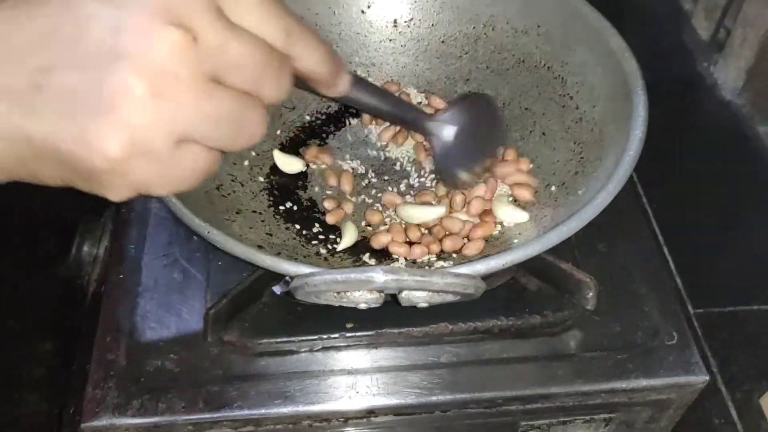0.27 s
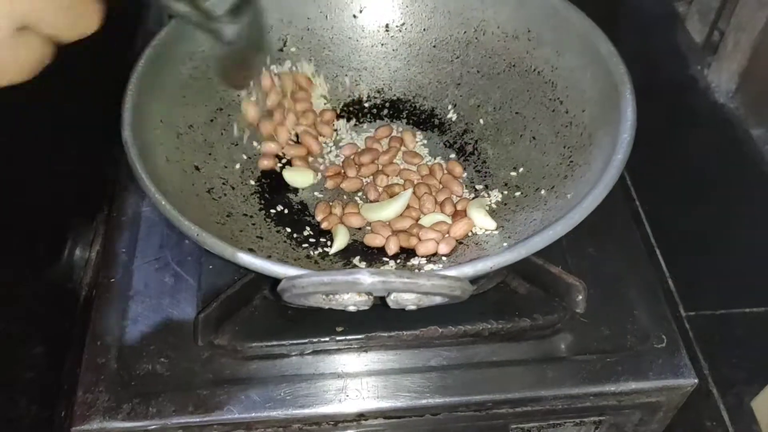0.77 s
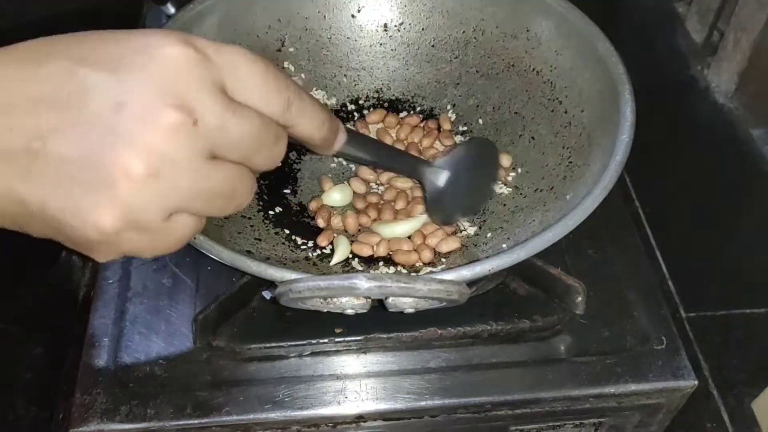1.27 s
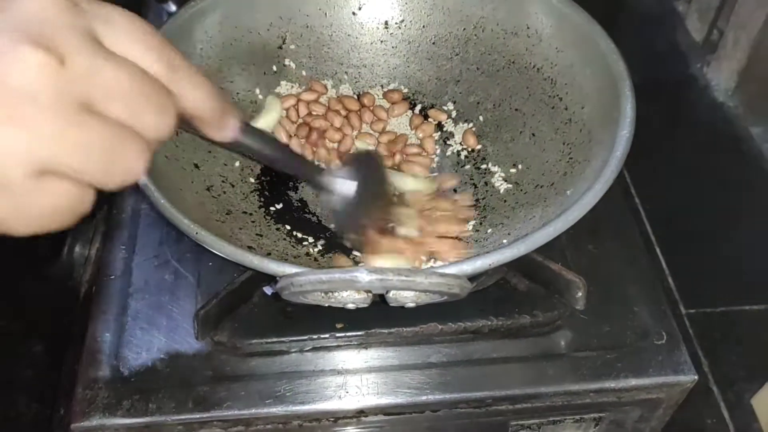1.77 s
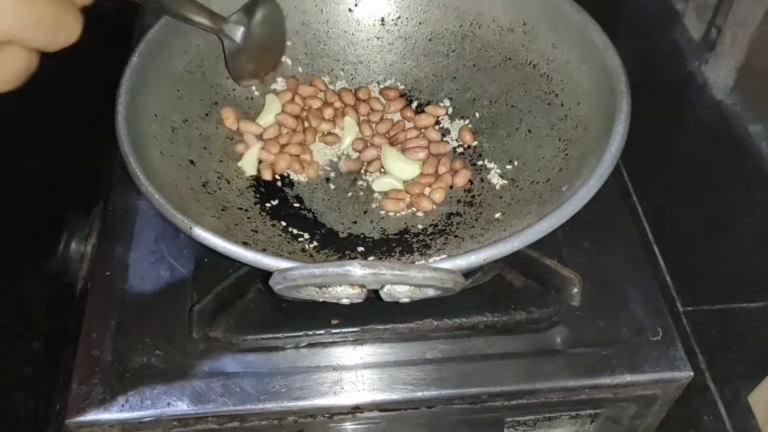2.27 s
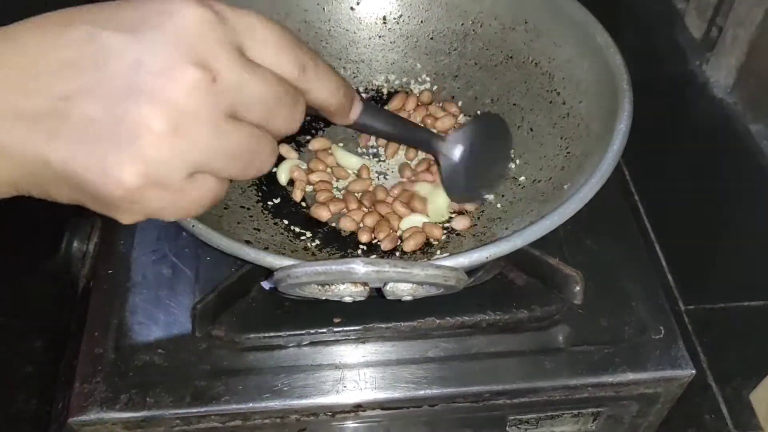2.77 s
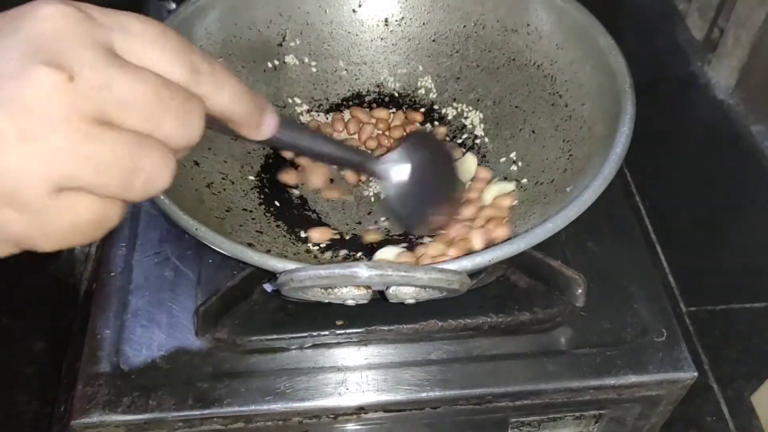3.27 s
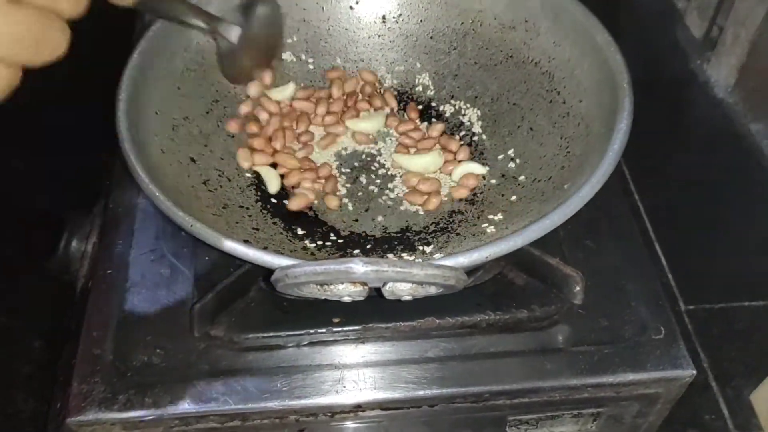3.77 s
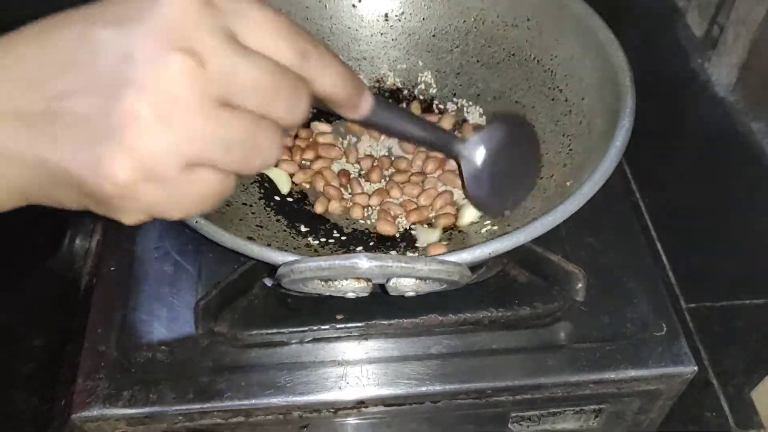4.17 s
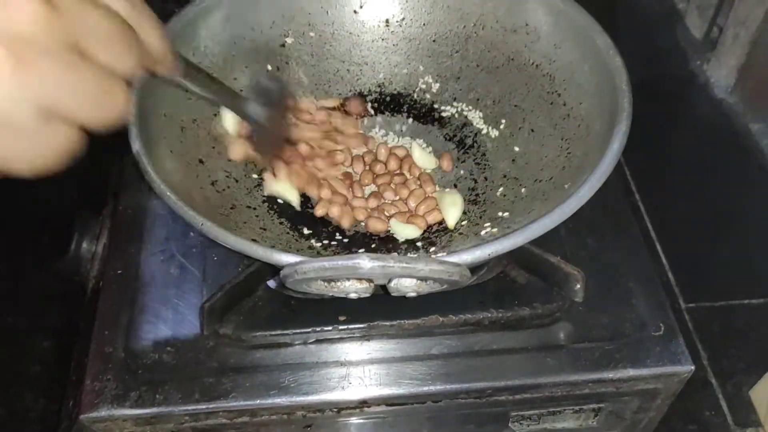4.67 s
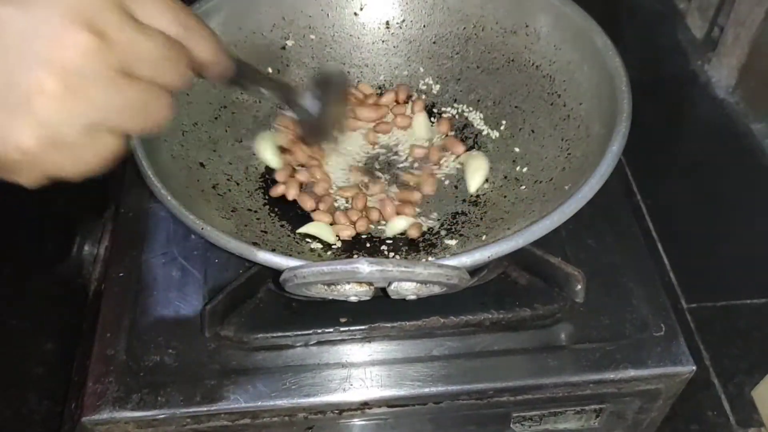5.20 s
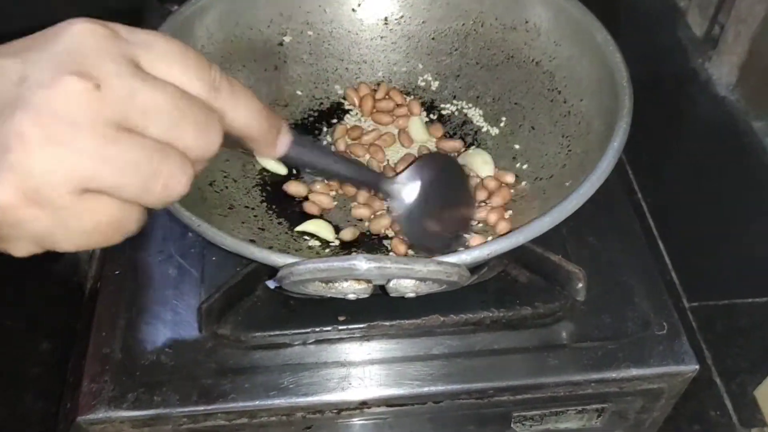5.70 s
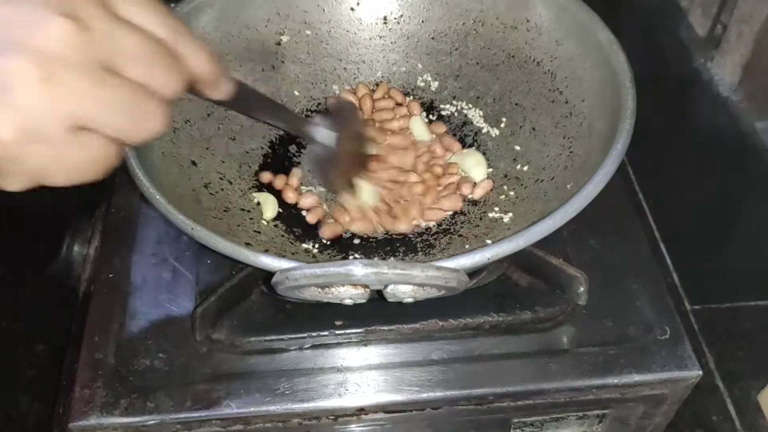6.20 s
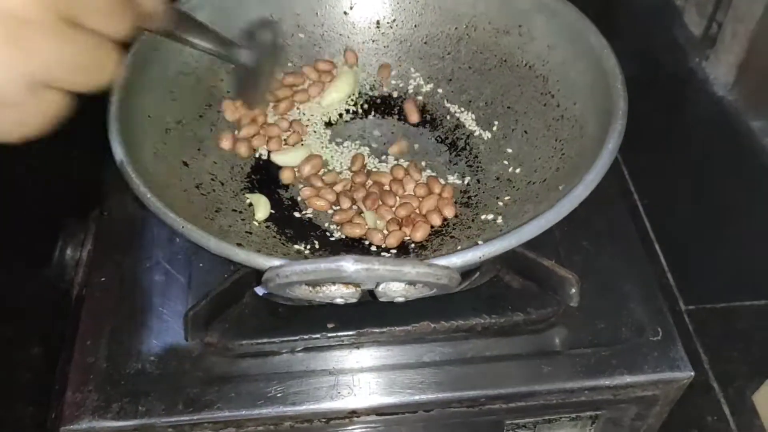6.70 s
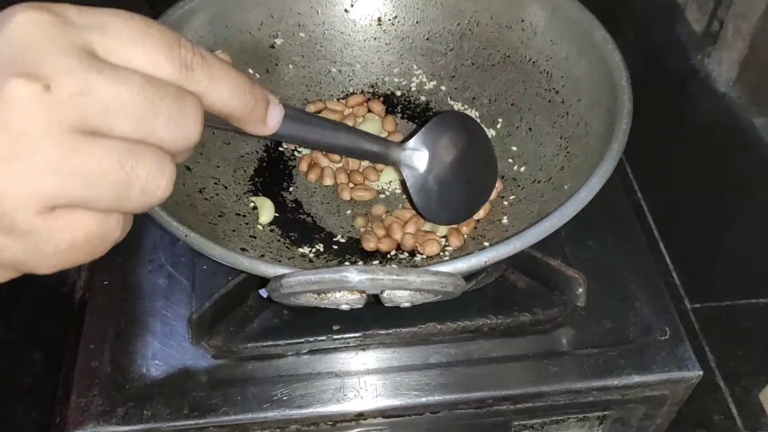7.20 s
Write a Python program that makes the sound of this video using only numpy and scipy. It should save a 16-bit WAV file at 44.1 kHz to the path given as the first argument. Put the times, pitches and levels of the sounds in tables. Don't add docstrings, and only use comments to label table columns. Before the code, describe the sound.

A metal ladle cracks into a thin metal pan about three times a second, dragging grittily through peanuts and seeds over a faintly hissing burner.

```python
import sys
import numpy as np
from scipy import signal
from scipy.fft import rfft, irfft
from scipy.io import wavfile
from scipy.ndimage import uniform_filter1d

SR = 44100
rng = np.random.default_rng(int(sys.argv[2]) if len(sys.argv) > 2 else 0)


def master(y):
    cut = np.clip(np.atleast_2d(y).T, -1, 1)
    pcm = np.round(cut * 32767)
    wavfile.write(sys.argv[1], SR, pcm.astype(np.int16))


def invert_db(level):
    return 10 ** (np.asarray(level, dtype=float) / 20)


N = 328545

# start in seconds, peak in dB, ladle note in Hz, thud in dB relative, ring in dB relative.
LANDINGS = [(0.0351, 5.5, 6130, -19, -9), (0.4748, 1, 6970, -21.5, -10), (0.7674, -17.5, 6080, -27, -1),
            (.845, 6.5, 6130, -24, -6.5), (1.265, -3.5, 6570, -10, -11), (1.6836, 6, 8020, -21.5, -20),
            (2.0552, -4, 7570, -6, -9), (2.359, 3.5, 3940, -15, -10), (2.728, -7, 6750, -8, -10),
            (3.1677, -2.2, 6370, -19, -14), (3.483, 2.2, 6870, -19, -11.5), (3.868, -19, 4060, -30, 1.5),
            (4.2229, -10, 6850, -7, -2.5), (4.6622, -7, 7440, -17, -23), (4.6963, 5.5, 6260, -18, -13.5),
            (5.027, -7, 8030, -7.5, -20), (5.3368, -19, 3970, -28, 1.5), (5.754, 4, 8950, -18.5, -15),
            (6.0975, 8.5, 8800, -19, -32), (6.5188, -1.5, 6890, -8.5, -6.5), (6.8241, -24, 4110, -10, 2),
            (6.9209, 3, 6750, -20.5, -10.5), (7.3734, -1.2, 8150, -12.5, -9)]
# [s, dB, Hz, dB, dB].
KNOCKS = [(.366, -25, 6830, -22, -6), (.395, -23, 6660, -12, -3), (0.585, -12, 7050, -23, -9),
          (0.738, -17, 3845, -2, -4), (1.1306, -19.5, 6740, -6.5, -19), (2.2314, -19, 6200, -14, -15),
          (2.4453, -19, 4470, -29, 1.5), (2.4574, -26, 8680, -32, -1.2), (2.8256, -14.5, 6870, -24, 3.5),
          (2.8943, -16, 4134, -4, 7), (3.112, -21, 3990, -17, -8.5), (3.125, -18, 6800, -11, -12),
          (3.2084, -8, 7400, -35, -7), (3.824, -22.5, 3820, -9, -1), (4.3832, -22.5, 6750, -28, 15),
          (4.5774, -42, 1770, -14, 9), (4.611, -36, 3920, -22, 5), (5.123, -16.5, 7240, -2, 0.5),
          (5.3844, -34, 4000, -21, 1), (5.734, -23, 10660, -5, -4), (6.6272, -19.5, 4110, -15, 6.5)]
# time in seconds, left over right in dB.
BLOW_LEAN = [(0, 3), (1.3, 6.5), (2.1, 7), (2.4, 4), (3.3, 6.5), (4.3, 4), (5.7, 7), (6.1, -0.5),
             (6.5, 4.5)]
# frequency in Hz, level in dB per Hz.
CRACK = [(590, -26.5), (1000, -8), (3080, -18), (4060, -9), (4940, -8.5), (6080, -2.5), (7310, 0),
         (8680, 2), (9300, -1), (15600, -12.5)]
# frequency in Hz, level in dB per Hz.
BOTTOM = [(88, -16), (150, -16.5), (522, -5.5), (684, -8.5), (808, -1.5), (1200, -14), (1800, -16.5),
          (2340, -126), (3960, -120)]


def blows():
    size = 1600
    t = np.arange(size) / SR
    crack, thud, ladle = np.zeros(N + size), np.zeros(N), np.zeros((2, N))
    for s, db, hz, thud_db, ring_db in sorted(LANDINGS + KNOCKS):
        at = round(s * SR)
        skip_s = rng.uniform(0.0047, 0.007)
        bounces = 0.3 + np.exp(-(t % skip_s) / 0.00091)
        t60 = 0.05 * invert_db(db / 3)
        envelope = bounces * (1 - np.exp(-t / 0.00022)) * invert_db(-60 * t / t60)
        chatter = rng.standard_normal((2, size)) * envelope
        crack[at:at + size] += invert_db(db - 1.0) * chatter[0]
        thud[at + 40] += invert_db(db + thud_db + 16.0)
        note = np.array([ring(ring(np.pad(c, (0, 4400)), hz, 75.0), hz, 630.0) for c in chatter])
        note *= invert_db(db + ring_db) * sides(5.2)[:, None] / abs(note).max(1, keepdims=True)
        ladle[:, at:at + 6000] += note[:, :N - at]
    lean_db = np.interp(np.arange(N) / SR, *np.transpose(BLOW_LEAN)) - 5.0
    bright = ladle + shake(crack[:N], CRACK, t60=0.022, even=0.2)
    dull = shake(thud, BOTTOM, t60=0.03, even=0.15)
    return bright * sides(lean_db) + signal.lfilter(*signal.butter(3, 260, "high", fs=SR), dull)


# slide in dB, push delay in seconds, push in dB,
# settling in dB, weight on the bottom in dB.
STROKES = [(-10, .19, -33, -33.5, -6), (-20.5, .12, -20.5, -33, 4.5), (-27, 0.035, -55, -55, 9.5),
           (-26, 0.049, -17, -34, -1.5), (-23, 0.079, -22, -31, -1.3), (-21.5, 0.037, -22.5, -33, 1),
           (-14, 0.21, -39, -59, -3.7), (-20.5, 0.079, -22.5, -33.5, -2), (-26.5, .14, -20, -31.5, 0.8),
           (-28, 0.037, -17.5, -33.5, -2.5), (-23.5, 0.09, -19, -32.5, -0.4), (-58, 0.16, -30.5, -34.5, -1),
           (-43, 0.15, -15, -29, -1.5), (-27.5, .02, -36, -40, 9), (-15.5, 0.05, -17.5, -30.5, 1),
           (-20, 0.092, -23, -29, -2), (-55, 0.2, -32.5, -31, -1), (-17, 0.076, -26.5, -38, 0.5),
           (-18.5, 0.081, -20, -31.5, -2), (-17.5, 0.072, -18.5, -33, 0.3), (-46, 0.042, -28.5, -38, 11.5),
           (-13.5, 0.08, -28, -39.5, -3), (-25, 0.093, -25, -36, 5)]
# push held in seconds, fine seeds in dB, whole nuts in dB.
HEAP = [(0.039, -5.5, 2), (0.063, 1, -4.5), (.01, -6, 5.5), (0.02, 1.5, 1.5), (0.022, 1.5, -3.5),
        (.01, 5, 2.5), (.01, -3, 5.5), (.02, -1, 2), (0.075, 1.5, -0.5), (0.016, -1.5, 3.5),
        (0.052, -0.5, -0.5), (0.096, -1, 2), (0.021, .3, 0), (.01, .3, -2), (0.018, -3, 3),
        (0.035, -1.5, 0), (0.1, 1, -1), (.02, -3, -2), (0.059, 1, 1), (0.018, -1, -1), (0.03, -4, -0.8),
        (0.017, -12, 1), (.01, 4, -20)]
# bottom rumble, nut rattle and fine seed hiss, all in dB relative.
PHASE_COLOURS = [
    (-8.5, -17, -9.5),
    (-12.5, -18, -13),
    (-10, -16.5, -9),
]


def stroke_controls():
    slide_fall, push_rise, push_fall, settle_fall = 157, 161, 164, 24.4
    push_round_s, slide_rise_s, resting_db = 0.0067, 0.0035, -64
    colours_db = np.array([[0, *c] for c in PHASE_COLOURS])
    power = np.full((4, N), invert_db(2 * resting_db)) * invert_db(2 * colours_db[2:].T)
    for landing, stroke, heap in zip(LANDINGS, STROKES, HEAP):
        slide_db, delay, push_db, settle_db, weight_db = stroke
        held, seeds_db, nuts_db = heap
        start = round(landing[0] * SR)
        t = np.arange(min(SR, N - start)) / SR
        outside = np.maximum(abs(t - delay) - held / 2, 0)
        away = np.hypot(outside, push_round_s) - push_round_s
        slide = slide_db - slide_fall * t
        push = push_db - np.where(t < delay, push_rise, push_fall) * away
        settle = settle_db - settle_fall * t
        phases = invert_db(2 * np.array([slide, push, settle]))
        layers_db = colours_db + [0, weight_db, weight_db + nuts_db, seeds_db]
        rise = 1 - np.exp(-(t / slide_rise_s) ** 2)
        previous = power[:, start - 1:start] * (1 - rise)
        power[:, start:start + SR] = invert_db(2 * layers_db.T) @ phases * rise + previous
    return 10 * np.log10([power[0], *power[1:] / power[0]])


def grit(per_s, spread_db, lumpy_db):
    size = invert_db(spread_db * np.minimum(rng.exponential(1, N), 5)) * rng.choice([-1., 1.], N)
    clumps = invert_db(lumpy_db * evened(uniform_filter1d(rng.standard_normal(N), size=300)))
    return evened(size * clumps * (rng.random(N) < per_s / SR))


# frequency in Hz, level in dB per Hz.
PAN_WALL = [(710, -52), (1200, -27), (1690, -26.5), (2140, -18.5), (3350, -18.5), (3820, -13), (4040, -7),
            (4400, -4.5), (4950, -5), (5690, -5.5), (6610, -2.5), (10700, -4.5), (15600, -14)]
# frequency in Hz, width in Hz, level in dB.
LADLE = [(1446, 24, -9), (1730, 21, -12.5), (2142, 58, -13.5), (3940, 23, -0.5), (4750, 120, 3),
         (6130, 19, 0), (6870, 100, 2), (7640, 22, -1), (8980, 69, 1), (10570, 40, 2)]


def drag():
    level_db, rumble_db, rattle_db, fine_db = stroke_controls()
    contacts = grit(5000, spread_db=2.0, lumpy_db=-1.0) * invert_db(level_db)
    knocks = grit(160, spread_db=4.0, lumpy_db=3.0) * invert_db(level_db - 11)
    wall = invert_db(2.5) * shake(contacts + knocks, PAN_WALL, t60=0.016, even=1.0)
    wall += band(wall, 10800, "high") * (invert_db(fine_db + 4.5) - 1)
    wall += band(wall, [1300, 3400]) * (invert_db(rattle_db + 16.5) - 1)
    for hz, width_hz, db in LADLE:
        for port in (0, 1):
            grip_db = db - 26 - 1.7 * port + 7.7 * wander(18.0)
            wall[port] += ring(contacts * invert_db(grip_db), hz, 0.5 * width_hz)
    nuts = grit(1500, spread_db=2.5, lumpy_db=-1.5) * invert_db(level_db + rumble_db - 0.1)
    return wall + shake(nuts, BOTTOM, t60=0.04, even=0.76)


# start in seconds, length in seconds, start pitch in Hz, end pitch in Hz, level in dB.
GROANS = [
    (.54, .069, 626, 490, -36),
    (.56, .05, 370, 280, -43),
    (.625, .09, 294, 285, -44),
    (.5, .08, 215, 170, -44),
    (6.825, .03, 370, 300, -37),
    (6.855, .03, 420, 330, -37),
    (6.87, .08, 290, 280, -42),
]


def groans():
    out = np.zeros(N)
    for s, length, start_hz, end_hz, db in GROANS:
        part = np.arange(round(length * SR)) / (length * SR)
        wobble = evened(uniform_filter1d(rng.standard_normal(8000), size=300))[:len(part)]
        pitch_hz = start_hz + (end_hz - start_hz) * part ** 1.45 + 10 * wobble
        moan = np.sqrt(np.sin(np.pi * part)) * np.sin(2 * np.pi * np.cumsum(pitch_hz) / SR)
        out[round(s * SR):][:len(part)] += invert_db(db + 6) * moan
    return out


def walls(x):
    t = np.arange(12000) / SR
    echoes = rng.choice([-1., 1.], (2, 12000)) * (rng.random((2, 12000)) < 0.05)
    taps = echoes * invert_db(-60 * t / 0.28) * (t > 0.006)
    return signal.oaconvolve(x, taps / np.linalg.norm(taps[0]), axes=1)[:, :N]


# frequency in Hz, level in dB per Hz.
KITCHEN = [(26, -12), (45, 2), (129, 2), (195, -9.5), (303, 4), (388, -11.5), (808, -5.5), (1190, -13),
           (1420, -18), (3420, -22), (4370, -20.5), (6960, -5.5), (10500, -14.5), (15600, -24)]
# time in seconds, rise in dB.
SURGES = [
    (.33, 7),
    (.81, 11),
    (1.41, 4),
    (1.8, 4.5),
    (2.9, 14),
    (3.95, 10),
    (4.4, 3),
    (5.89, 4),
    (7.24, 6),
]


def kitchen():
    t = np.arange(N) / SR
    hiss_db = -41.5 + 1.5 * wander(4.0)
    hiss = evened(irfft(pair(KITCHEN, np.ones(N), N)[:, 0], N))
    surge_db = sum(db * np.exp(-((t - s) / 0.086) ** 2) for s, db in SURGES)
    rumble = invert_db(-49.5 + surge_db) * far_machine([25, 38], 0.18)
    swell_db = 12.5 * np.exp(-((t - 6.77) / 0.49) ** 2)
    hum = invert_db(-57.5 + 2.5 * wander(3.3) + swell_db) * far_machine([105, 135], 0.081)
    return invert_db(hiss_db) * hiss + rumble + hum


def far_machine(edges_hz, own_share):
    noise = rng.standard_normal(N + SR) + own_share * rng.standard_normal((2, N + SR))
    return evened(band(noise, edges_hz)[:, SR // 2:SR // 2 + N])


def shake(force, colour, t60, even=0):
    hop, count = 1024, N // 1024 + 1
    t = np.arange(2 * hop) / SR
    bursts = pair(colour, invert_db(-60 * t / t60), 4 * hop, count, even)
    at = np.arange(count)[:, None] * hop + np.arange(2 * hop)
    window = np.sin(np.pi * np.arange(2 * hop) / (2 * hop))
    pieces = np.pad(force, (hop, 2 * hop))[at] * window
    rung = irfft(rfft(pieces, 4 * hop) * bursts)
    out = np.zeros((2, N + 6 * hop))
    for k in range(4):
        part = rung[:, k::4].reshape(2, -1)[:, :N + (6 - k) * hop]
        out[:, k * hop:k * hop + part.shape[1]] += part
    return out[:, hop:hop + N]


def ring(force, hz, width_hz):
    r = np.exp(-np.pi * width_hz / SR)
    turn = 2 * np.pi * hz / SR
    mode = signal.lfilter([np.sin(turn)], [1, -2 * r * np.cos(turn), r * r], force)
    return np.sqrt(2 * (1 - r * r)) * mode


# frequency in Hz, left-right likeness from 0 to 1.
PORT_LIKENESS = [(60, 0.94), (130, 1), (290, 1), (640, 0.79), (1410, -0.0), (3100, 0.13), (6820, 0.0),
                 (15000, 0.089)]
# frequency in Hz, left over right in dB.
PORT_BALANCE = [(60, 0), (180, 2), (550, 2), (1650, 0), (4970, 7.5), (15000, 3)]


def pair(colour, fade, size, count=1, even=0):
    hz = np.fft.rfftfreq(size, 1 / SR)
    a, b = rfft(rng.standard_normal((2, count, len(fade))) * fade, size)
    same = np.clip(read(PORT_LIKENESS, hz), -1, 1)
    z = np.array([a, same * a + np.sqrt(1 - same ** 2) * b])
    z /= abs(z) ** np.clip(even, 0, 1)
    z = z * invert_db(read(colour, hz)) * sides(read(PORT_BALANCE, hz))[:, None]
    return z / np.sqrt(np.mean(abs(z) ** 2))


def read(points, hz):
    f, value = np.transpose(points)
    return np.interp(np.log(hz + 1), np.log(f + 1), value)


def sides(pan_db):
    return invert_db(np.array([pan_db / 2, -pan_db / 2]))


def wander(per_s):
    knots = rng.standard_normal(400)
    return np.interp(np.arange(N) / SR * per_s, np.arange(400), knots)


def evened(x):
    return x / np.sqrt(np.mean(x ** 2) + 1e-20)


def band(x, edges_hz, kind="band"):
    return signal.sosfiltfilt(signal.butter(3, edges_hz, kind, fs=SR, output="sos"), x)


def scene():
    hits = blows()
    return hits + drag() + groans() + invert_db(-6) * walls(hits) + kitchen()


def low_pass(x):
    return signal.sosfilt(signal.butter(12, 16460, fs=SR, output="sos"), x)


def record(dry):
    edge = signal.firwin(511, 15850, window=("kaiser", 9), fs=SR)
    heard = signal.oaconvolve(dry, edge[None], "same", axes=1)
    notch_hz, width_hz = 3360, 270
    heard = heard - 0.18 * band(heard, [notch_hz - width_hz / 2, notch_hz + width_hz / 2])
    return low_pass(np.clip(heard, -1, 1))


dry = scene()
out = record(dry)
master(out)
```